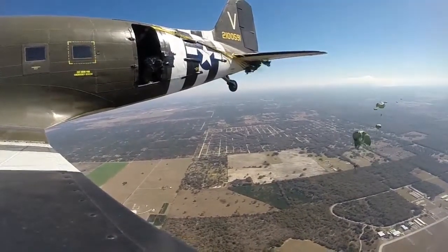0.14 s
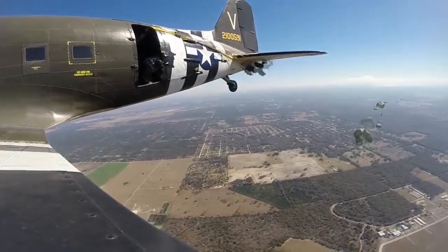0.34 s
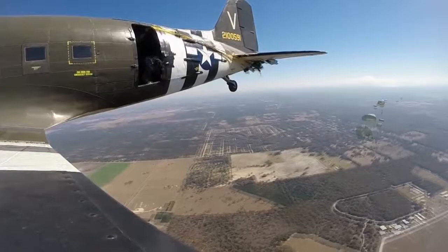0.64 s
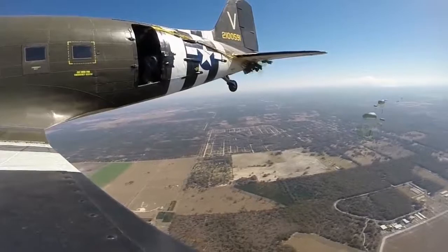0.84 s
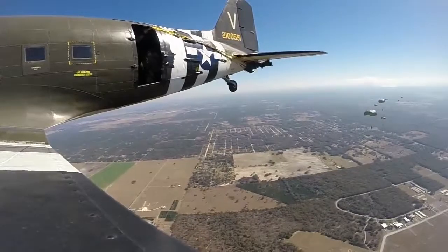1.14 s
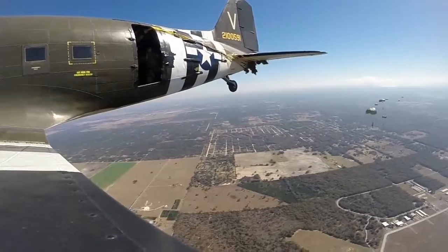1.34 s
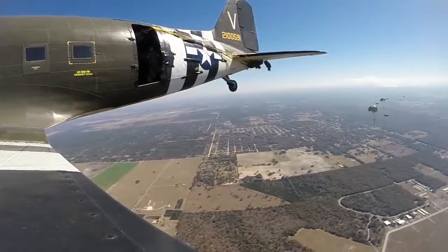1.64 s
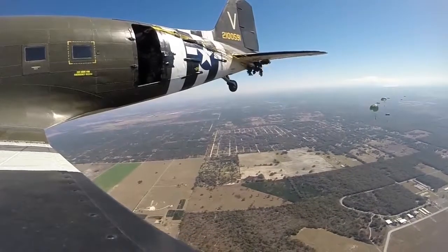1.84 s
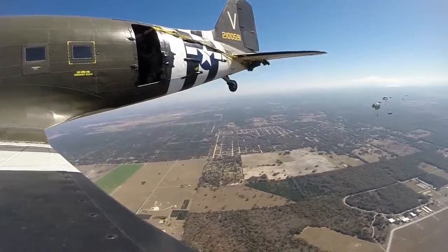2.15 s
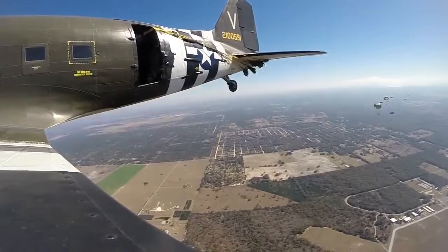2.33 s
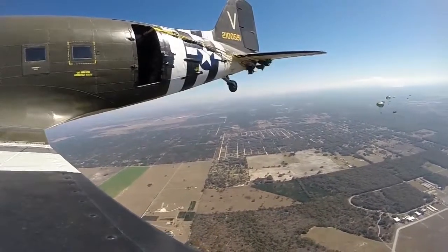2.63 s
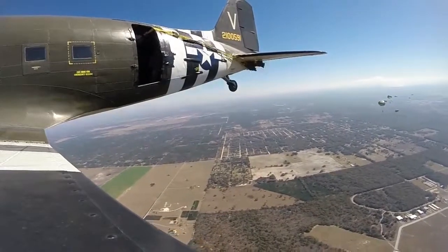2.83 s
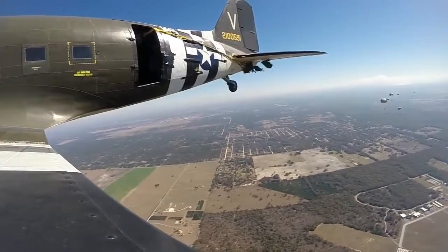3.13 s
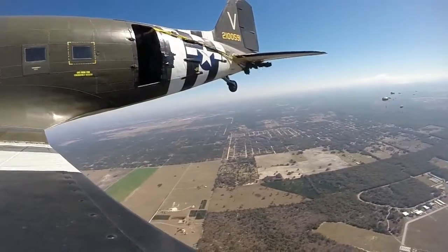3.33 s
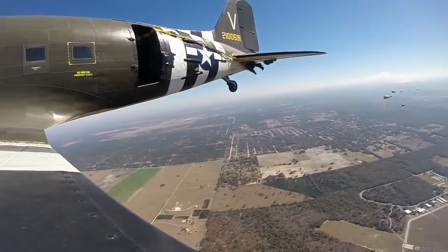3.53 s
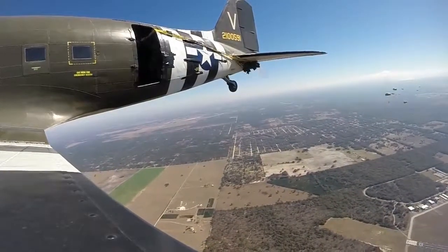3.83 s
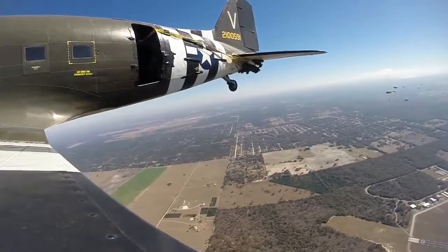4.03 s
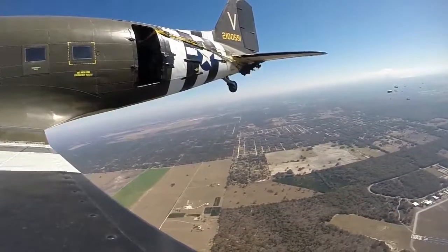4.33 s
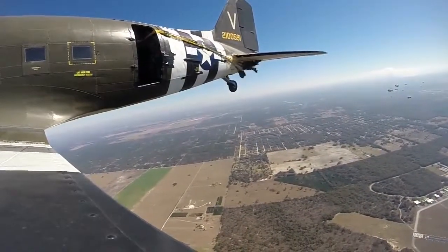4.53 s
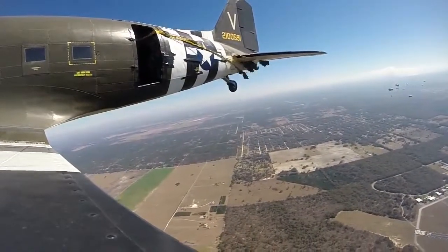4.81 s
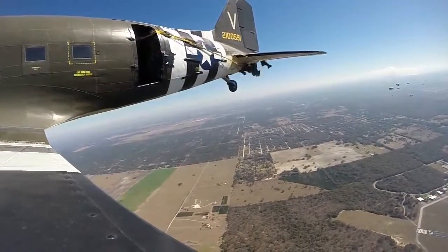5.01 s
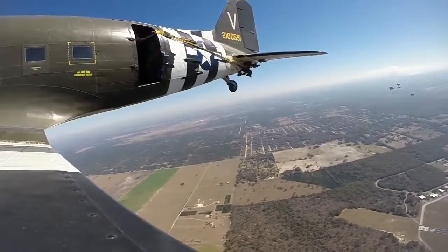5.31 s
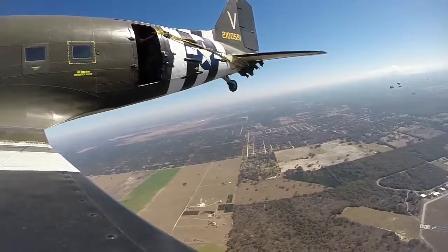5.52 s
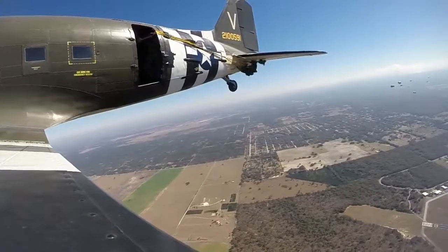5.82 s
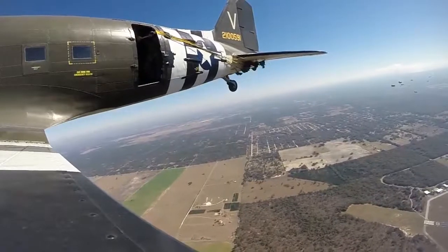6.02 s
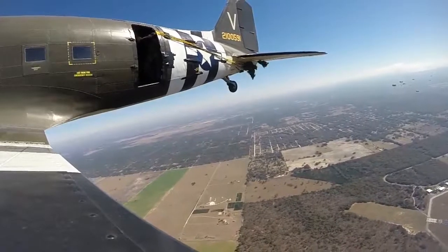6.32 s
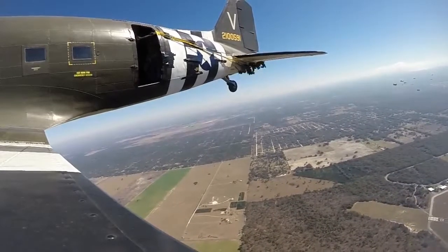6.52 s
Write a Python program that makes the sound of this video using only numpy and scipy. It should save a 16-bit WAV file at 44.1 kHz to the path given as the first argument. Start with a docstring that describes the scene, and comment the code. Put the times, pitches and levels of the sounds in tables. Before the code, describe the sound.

Fading in over the first second, a twin-engined propeller aircraft drones in level flight. Low engine and propeller tones hum and beat slowly together under a broad, hollow, resonant roar of rushing air. Skin rumble and deep buffeting swell irregularly, and blunt wind thumps hit the small microphone mounted outside on the wing, briefly ducking the sound. The drone continues to the end without any change of engine speed.

```python
"""On the wing of a twin-engined propeller aircraft in level flight, a small camera's microphone at the skin.
Engine orders and blade passes hum as drifting tones; those of the far engine beat with the near one.
The slipstream roars as noise in the resonances of the housing, over the rumble and buffeting of the skin.
Lumps of turbulence thump the microphone and make its limiter duck. The sound fades in over a second."""
import sys
import numpy as np
from scipy import signal
from scipy.fft import rfft, irfft
from scipy.io import wavfile
from scipy.ndimage import uniform_filter1d

SR = 44100
rng = np.random.default_rng(int(sys.argv[2]) if len(sys.argv) > 2 else 0)


def generate_wav(sig):
    """Save sig (samples, or channels by samples) to the path in sys.argv[1] as 16-bit PCM at SR."""
    pcm = np.round(np.clip(np.atleast_2d(sig).T, -1, 1) * 32767).astype(np.int16)
    wavfile.write(sys.argv[1], SR, pcm)


N = 293706

CYCLE_HZ = 17.748  # one four-stroke cycle, two crankshaft turns
SLIP_HZ = .075  # the far engine's cycle is slower by this much
# Once a cycle, as at this moment, engine orders up to this pitch crest together in one pulse.
PULSE_S, IN_STEP_HZ = 3.0025, 150
# Engine orders: cycle_multiple, level_db, waver_db, phase_wander_cycles
ENGINE_ORDERS = [(2, -29.5, 1.5, .03), (4, -20, 1.2, .025), (6, -40, 2, .03), (7, -25.5, 2, .04),
                 (8, -35, 3, .07), (11, -44, 2, .04), (12, -45, 2, .04), (15, -44, 3, .1),
                 (20, -53, 2, .05), (21, -53, 2, .05), (22, -48, 1.5, .04), (23, -43, 3.5, .14),
                 (28, -50, 2, .08), (29, -52, 2, .06), (30, -54, 2, .06), (36, -48, 2, .06),
                 (37, -53, 2, .06), (39, -50, 2, .07), (40, -52, 2, .07), (42, -52, 2, .07),
                 (43, -52.5, 2, .06), (44, -58, 2, .07)]
# Orders in which the two engines beat: cycle_multiple, near_engine_db, far_engine_share (ratio), swell_s
ENGINE_BEATS = [(5, -23.5, 0.52, 0.74), (9, -41, 4.14, 2.916), (13, -38.5, 1.16, 2.847)]

GEAR, BLADES = 9 / 16, 3  # propeller turns per crankshaft turn; blades on a propeller
# Blade passes over time: time_s, level_db
BLADE_LEVEL = [(0, -24), (.75, -28), (1.75, -36), (2.25, -27), (2.9, -25), (3.9, -23), (4.3, -27),
               (5.25, -30), (5.75, -32), (6.05, -25), (6.66, -21)]
# Harmonics of the blade rate: rate_multiple, level_db (above BLADE_LEVEL), waver_db, phase_wander_cycles
BLADE_HARMONICS = [(1, 0, .8, .03), (2, -10, 2, .05)]

# Slipstream roar before gusts: time_s, level_db
ROAR_LEVEL = [(0, -24.5), (.7, -23.5), (1.4, -26), (1.65, -26), (2.75, -23.5), (3.5, -27), (3.95, -26),
              (4.2, -29), (4.8, -26), (5.2, -26), (5.95, -25.5), (6.3, -24), (6.66, -22.5)]
# Relative slipstream spectrum: pitch_hz, density_db (per Hz)
ROAR_SPECTRUM = [(180, -17), (300, -7), (550, -9), (900, -12), (1470, -10.5), (2140, -15.5), (3070, -24),
                 (4050, -26.5), (6630, -30), (8200, -40.5), (11200, -44), (12400, -47.5), (13000, -53),
                 (15200, -61)]
# Resonances (+) and hollows (-) of the housing: pitch_hz, width_hz, lift_db
HOUSING_MODES = [(496.4, 50, 6.5), (650, 100, 6), (725, 46, 5), (868, 145, -4.5), (1315, 81, 5.5),
                 (1479, 61, 8.5), (1868, 180, 4), (2150, 105, -9), (2446, 700, 7.5), (3414, 360, 5),
                 (3435, 74, 4), (4434, 83, 7.5), (5210, 150, 8), (6550, 170, 6.5), (7420, 490, 7),
                 (8800, 650, 5.5), (11120, 470, 5.5), (12200, 420, 1.5)]
# Gusts that swell the roar, and lulls: peak_s, lift_db
GUST_LIFTS = [(1.25, 5), (1.38, 4), (1.56, 2), (1.89, 3.5), (2.22, 1), (2.52, 1.5), (2.63, -1),
              (2.78, -2.5), (3.07, -1), (3.22, 1.5), (3.36, 0.5), (3.66, 2.5), (3.78, 1), (4.1, 4),
              (4.26, 3), (4.38, 3.5), (4.61, 3), (4.74, 0.5), (5.07, 1.5), (5.52, 0), (5.85, 2.5),
              (6.02, 0.5), (6.2, 2)]
GUST_S = 0.066  # from a gust's peak to 1/e of its lift in dB

# Skin rumble before RUMBLE_TRIM_DB: time_s, level_db
RUMBLE_LEVEL = [(0, -19.5), (.4, -17), (1, -15.5), (1.5, -17), (2, -17.5), (2.8, -17), (3.5, -19),
                (4.25, -19.5), (4.9, -16.5), (5.5, -20.5), (6.1, -16.5), (6.66, -16.5)]
RUMBLE_TRIM_DB = -0.4
# Relative spectrum of turbulence on the skin: pitch_hz, density_db (per Hz)
RUMBLE_SPECTRUM = [(7, -38), (15, -20), (27, -17), (40, 2.5), (62, 0), (97, 0), (170, -5), (185, -12),
                   (300, -14), (345, -16), (400, -24.5), (450, -24.5), (900, -120)]
# Panel resonances (+) and hollows (-): pitch_hz, width_hz, lift_db
SKIN_MODES = [(56.5, 27, -18), (118.4, 12.3, -9), (125.7, 2.6, 6), (135.4, 7.3, -6), (144, 10.4, 7.5),
              (221.5, 5.2, 7), (338, 22, 3)]
# As the airflow changes, resonances wander by these shares of their pitch and of their lift in dB.
SHIFT, BREATHE = .003, .08

BUFFET_HZ, BUFFET_WIDTH_HZ = 44, 6
BUFFET_EVEN = 0.79  # share of the mode's own wavering that is taken out
# Low buffeting: time_s, level_db
BUFFET_LEVEL = [(0, -28), (.27, -10.5), (.5, -35), (.75, -17), (.95, -16.5), (1.15, -20), (1.5, -24),
                (2.1, -18), (2.5, -23), (2.75, -16.5), (3, -20), (3.5, -25), (3.75, -44), (4, -24),
                (4.15, -13.5), (4.45, -17.5), (4.9, -24), (5.2, -23), (5.35, -13), (5.55, -22), (5.7, -19),
                (6, -15), (6.2, -33), (6.35, -13.5), (6.66, -38)]

# Lumps of turbulence that strike the port, before the limiter: peak_s, peak_db
THUMP_PEAKS = [(0.651, -6), (1.271, -6), (1.913, -6), (2.662, -6), (2.743, -3), (3.007, -6), (3.286, -3),
               (3.859, -7.5), (4.15, -6), (4.263, -2), (4.638, -5.5), (5.239, -6), (5.485, -3.5),
               (5.619, -3), (6.067, -7), (6.61, -2)]
THUMP_S = .0024  # from the peak of the swing to its zero crossing

LIMIT_DB, RECOVER_DB_PER_S = -5, 42
LOW_CUT_HZ, EDGE_HZ = 16.5, 15150
FADE_START_S, FADE_FULL_S = 0.024, 1.063  # straight in amplitude


def amp(db):
    """Decibels to gain."""
    return 10 ** (np.asarray(db) / 20)


def evened(x):
    """Scales to rms 1."""
    return x / np.sqrt(np.mean(x ** 2) + 1e-20)


def curve(rows, column):
    """One column of a table, interpolated sample by sample."""
    rows = np.asarray(rows)
    return np.interp(np.arange(N) / SR, rows[:, 0], rows[:, column])


def drift(top_hz, t):
    """Slow chance: sines of random phase up to top_hz, weaker as they quicken."""
    f = np.geomspace(top_hz / 20, top_hz, num=24)[:, None]
    sines = np.sin(2 * np.pi * (f * t + rng.random(f.shape)))
    return evened((sines / np.sqrt(f)).sum(0))


def hum(hz, db, waver_db, wander, in_step=True):
    """A tone (as a turning phasor) whose strength and phase drift slowly."""
    t, coarse = np.arange(N) / SR, np.arange(0, N / SR + .02, .01)
    strength = np.interp(t, coarse, drift(2.497, coarse))
    phase = np.interp(t, coarse, drift(2.497, coarse))
    start_turns = rng.random() * (hz > IN_STEP_HZ or not in_step)
    turns = hz * (t - PULSE_S) + wander * phase + start_turns
    # The root of 2 makes db the rms level of the real part.
    return np.sqrt(2) * amp(db + waver_db * strength) * np.exp(2j * np.pi * turns)


def engines():
    """Orders of the firing cycle, beats with the far engine, and the passes of the geared propeller blades."""
    t = np.arange(N) / SR
    orders = sum(hum(k * CYCLE_HZ, *rest) for k, *rest in ENGINE_ORDERS)
    beats = 0
    for k, db, share, swell_s in ENGINE_BEATS:
        near = hum(k * CYCLE_HZ, db, .9, .006 * k)
        # The far engine lags steadily, and comes into step at swell_s.
        far = share * np.exp(-2j * np.pi * k * SLIP_HZ * (t - swell_s)) * near
        beats = beats + near + far
    blade_hz = 2 * CYCLE_HZ * GEAR * BLADES
    blades = sum(hum(k * blade_hz, *rest, in_step=False) for k, *rest in BLADE_HARMONICS)
    return (orders + beats + amp(curve(BLADE_LEVEL, column=1)) * blades).real


def noise(spectrum, lifts, size, patchy_db, flicker_db, flicker_hz, wander_hz):
    """Random short-time spectra with wandering resonances, drifting patches and a flicker stronger in the treble."""
    hop = size // 4
    frames, hz = N // hop + 5, np.fft.rfftfreq(size, 1 / SR)[:, None]
    t = np.arange(frames) * hop / SR
    a, b, patches = rng.standard_normal((frames, len(hz), 3)).T
    patches = uniform_filter1d(patches, size=12, axis=0)  # across pitch
    patches = evened(uniform_filter1d(patches, size=8, axis=1))  # across time
    f, db = np.transpose(spectrum)
    field_db = np.interp(np.log(hz + 1), np.log(f + 1), db)
    for centre_hz, width_hz, lift_db in lifts:
        lift = lift_db * (1 + BREATHE * drift(wander_hz, t))
        centre = centre_hz * (1 + SHIFT * drift(wander_hz, t))
        field_db = field_db + lift / (1 + (2 * (hz - centre) / width_hz) ** 2)
    flicker = drift(flicker_hz, t) * (hz / 4000) ** 0.13
    field_db = field_db + patchy_db * patches + flicker_db * flicker
    field = (a + 1j * b) * amp(field_db)
    return evened(signal.istft(field, nperseg=size, noverlap=size - hop)[1][:N])


def slipstream():
    """Roar coloured by the housing, swelled by gusts and fluttered by eddies, over the throbbing rumble of the skin."""
    t = np.arange(N) / SR
    roar = noise(ROAR_SPECTRUM, HOUSING_MODES, size=1024, patchy_db=0.34, flicker_db=-0.5,
                 flicker_hz=71.2, wander_hz=9.0)
    # Small eddies: white noise smoothed above 37 Hz.
    eddies = evened(signal.lfilter([1], [1, -np.exp(-2 * np.pi * 37.0 / SR)], rng.standard_normal(N)))
    gusts_db = sum(db * np.exp(-((t - s) / GUST_S) ** 2) for s, db in GUST_LIFTS)
    roar_db = curve(ROAR_LEVEL, column=1) + gusts_db + 1.07 * eddies
    rumble = noise(RUMBLE_SPECTRUM, SKIN_MODES, size=8192, patchy_db=0.77, flicker_db=0.1,
                   flicker_hz=2.3, wander_hz=2.5)
    throb_db = .6 * np.interp(t, t[::200], drift(40.0, t[::200]))
    rumble_db = curve(RUMBLE_LEVEL, column=1) + throb_db + RUMBLE_TRIM_DB
    return amp(roar_db) * roar + amp(rumble_db) * rumble


def buffeting():
    """Turbulence shakes one low, broad mode of the mount: noise through a resonance, its wavering partly evened."""
    hz = np.fft.rfftfreq(N, 1 / SR)
    mode = 1 / (1 + (2 * (hz - BUFFET_HZ) / BUFFET_WIDTH_HZ) ** 2)
    shake = evened(irfft(rfft(rng.standard_normal(N)) * mode, N))
    envelope = abs(signal.hilbert(shake))
    shake = shake / (envelope + 0.091) ** BUFFET_EVEN
    return amp(curve(BUFFET_LEVEL, column=1)) * evened(shake)


def thumps(shaking):
    """Each lump is one swing of pressure, with weaker swings back either side, that adds to the shaking under way."""
    half = 2000  # samples either side of the peak
    out, u = np.zeros(N), np.arange(-half, half) / SR / THUMP_S
    lump = (1 - u ** 2) * np.exp(-u ** 2 / 2)
    for s, db in THUMP_PEAKS:
        at = round(s * SR) - half
        part = out[at:][:len(u)]  # a view: adding to it adds to out
        swing = lump[:len(part)]
        direction = np.sign(swing @ shaking[at:][:len(u)])
        part += direction * amp(db) * swing
    return out


def scene():
    """Everything at the one microphone on the wing."""
    steady = engines() + slipstream() + buffeting()
    return (steady + thumps(steady))[None]


def record(dry):
    """A peak limiter drops fast and recovers slowly; then the low cut, the fade and the band limit."""
    t = np.arange(N) / SR
    level_db, fall = 20 * np.log10(abs(dry[0]) + 1e-9), t * RECOVER_DB_PER_S
    held_db = np.maximum.accumulate(level_db + fall) - fall  # peaks held, then falling steadily
    over_db = np.maximum(held_db - LIMIT_DB, 0)
    over_db = signal.lfilter([.04], [1, -.96], over_db)  # about half a millisecond to react
    limited = dry * amp(-.9 * over_db)  # nine tenths of the excess is taken off
    low_cut = signal.butter(2, LOW_CUT_HZ, "high", fs=SR, output="sos")
    fade = np.clip((t - FADE_START_S) / (FADE_FULL_S - FADE_START_S), 0, 1)
    faded = signal.sosfilt(low_cut, limited) * fade
    band_limit = signal.firwin(1023, EDGE_HZ, window=("kaiser", 9), fs=SR)
    return signal.oaconvolve(faded, band_limit[None], "same")


dry = scene()
out = record(dry)
generate_wav(out)
```